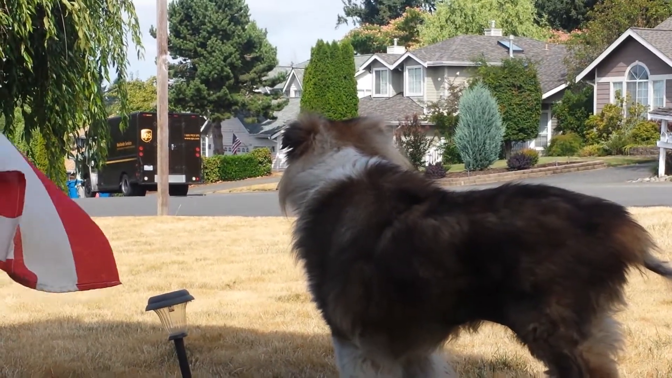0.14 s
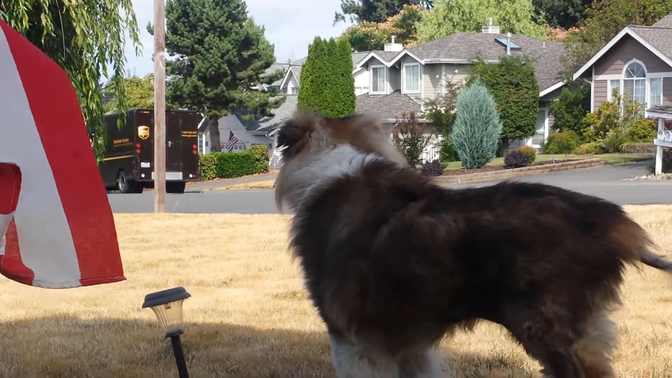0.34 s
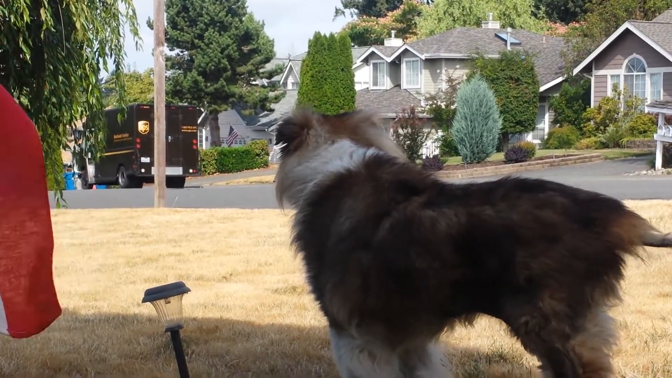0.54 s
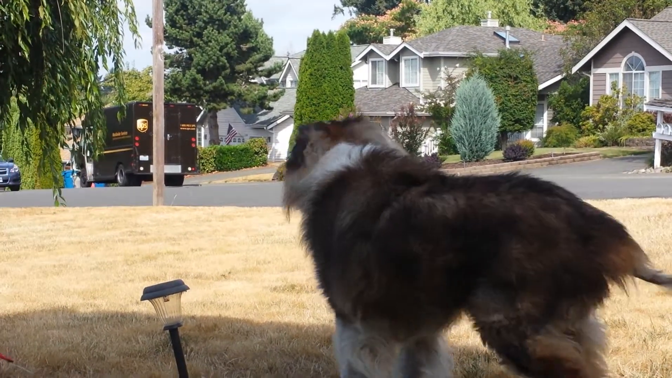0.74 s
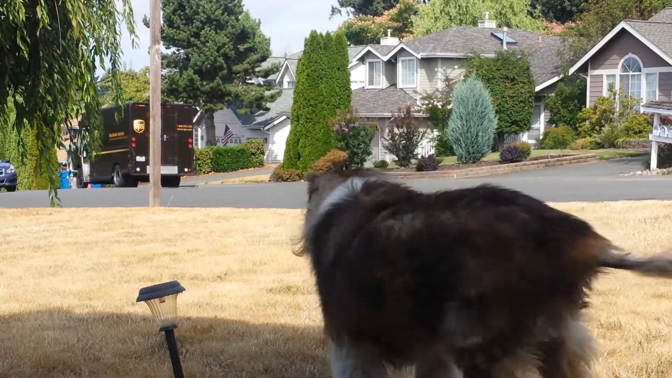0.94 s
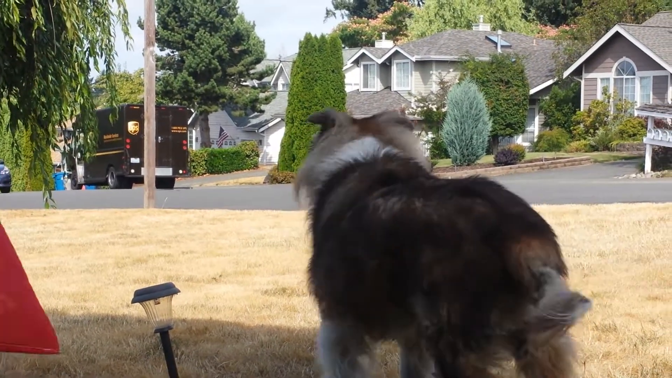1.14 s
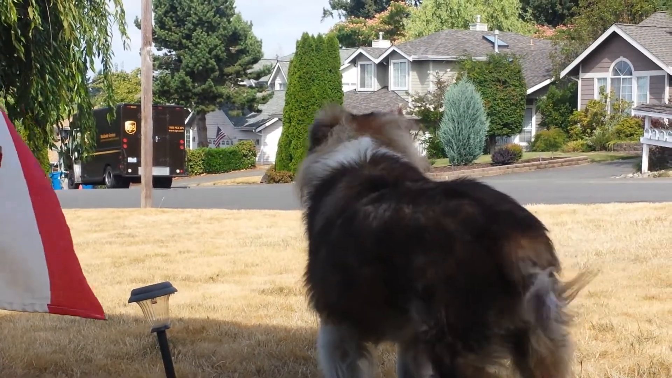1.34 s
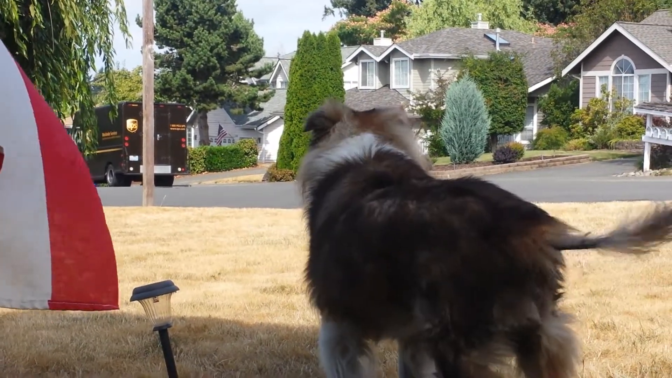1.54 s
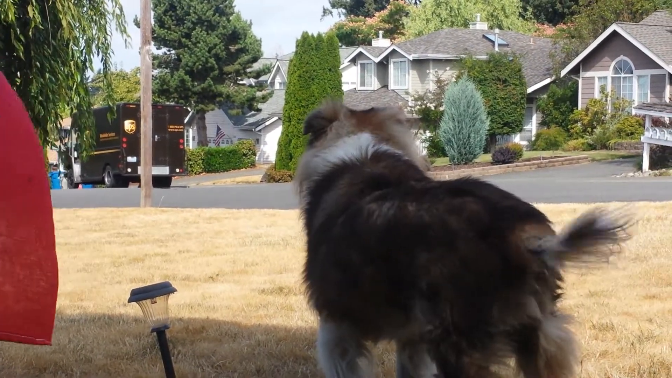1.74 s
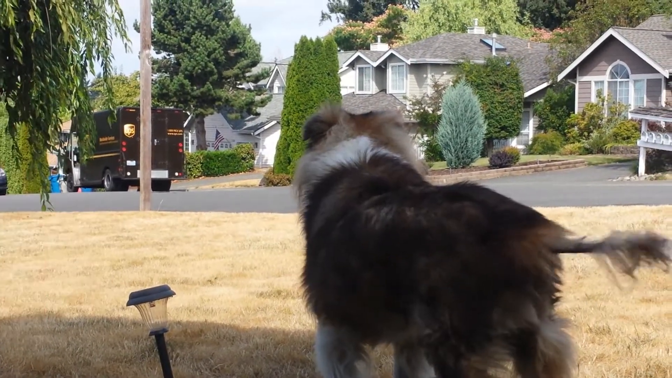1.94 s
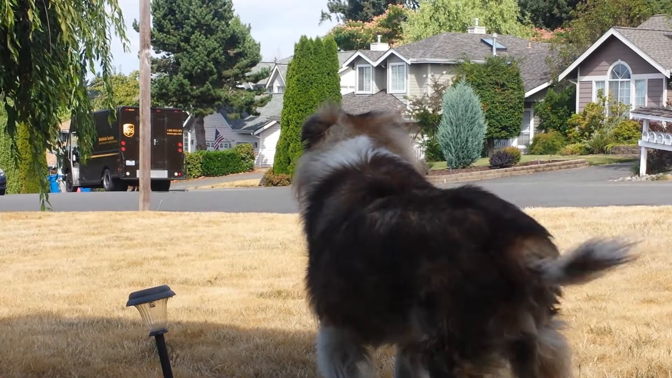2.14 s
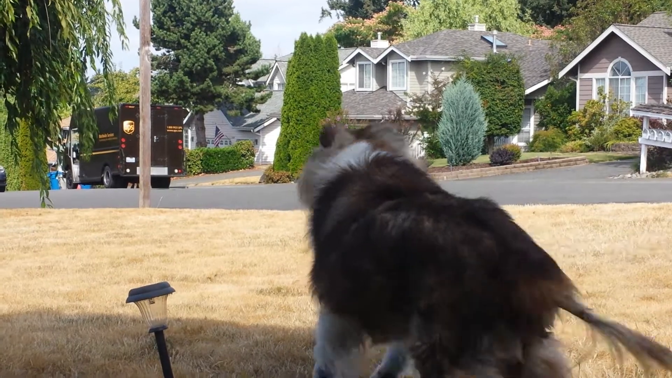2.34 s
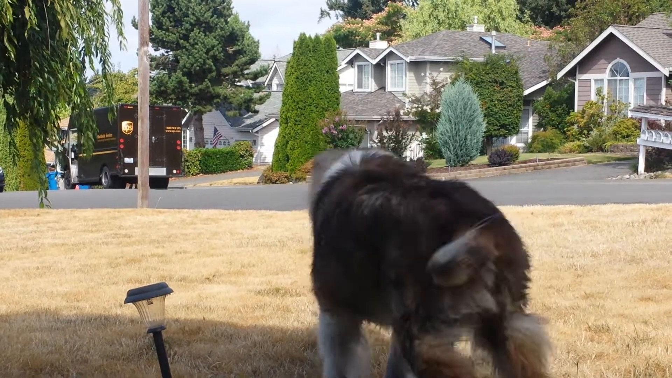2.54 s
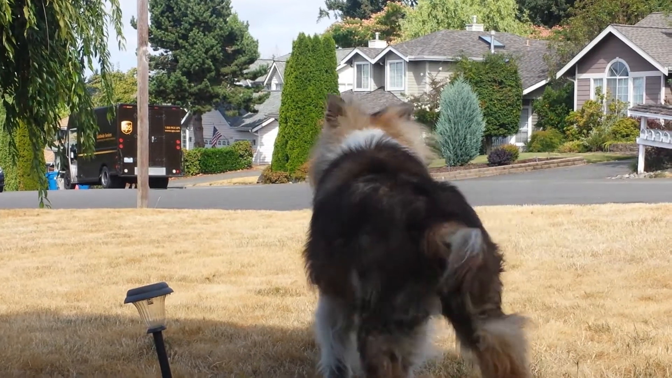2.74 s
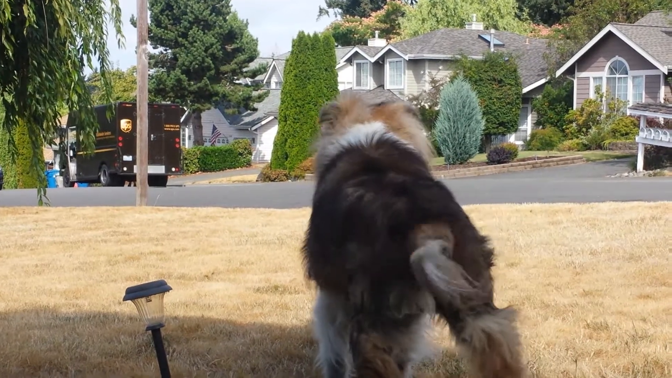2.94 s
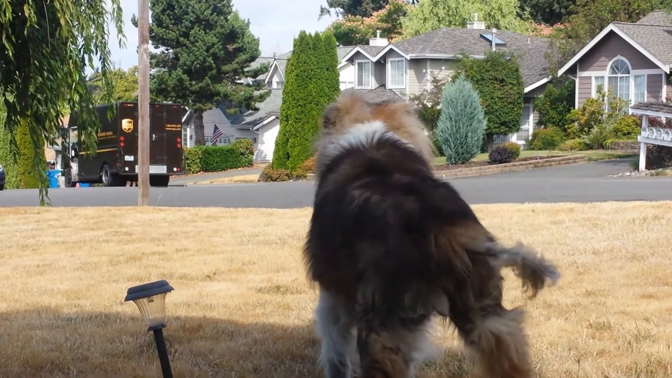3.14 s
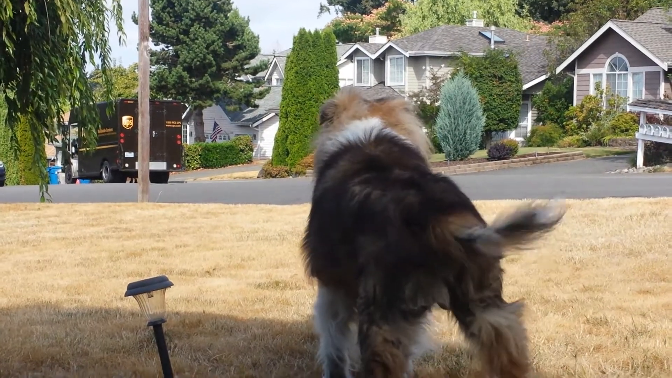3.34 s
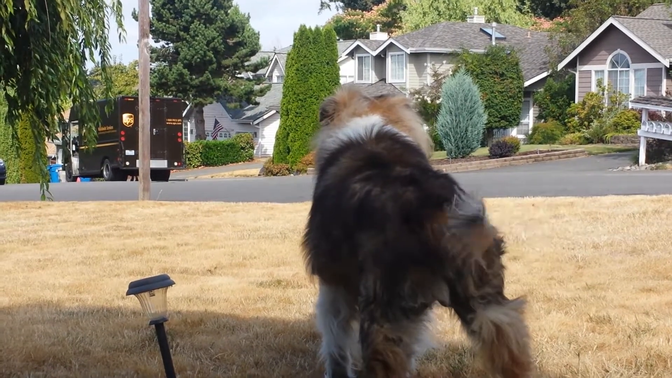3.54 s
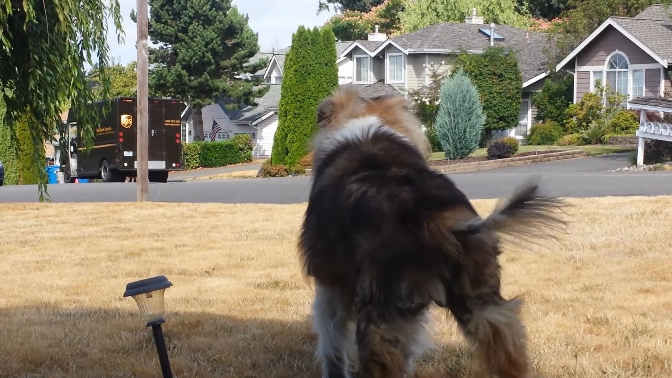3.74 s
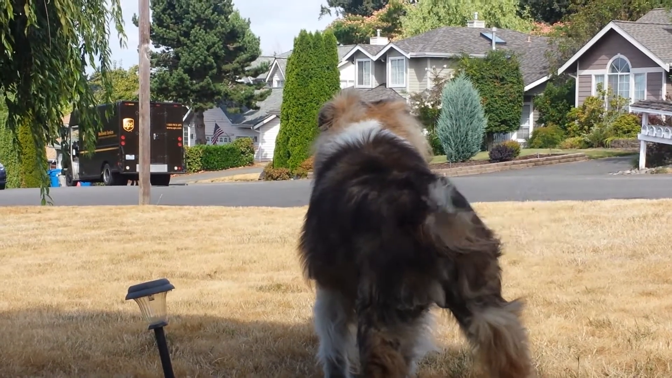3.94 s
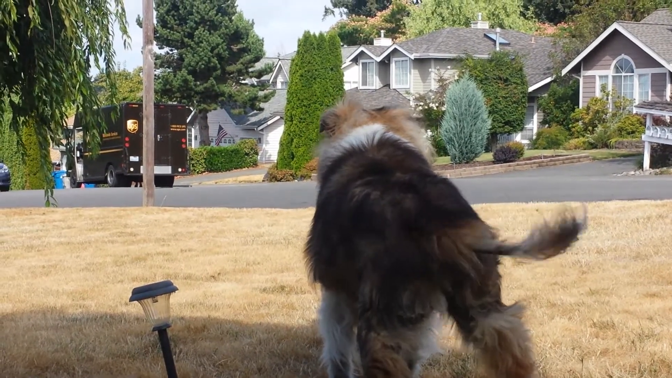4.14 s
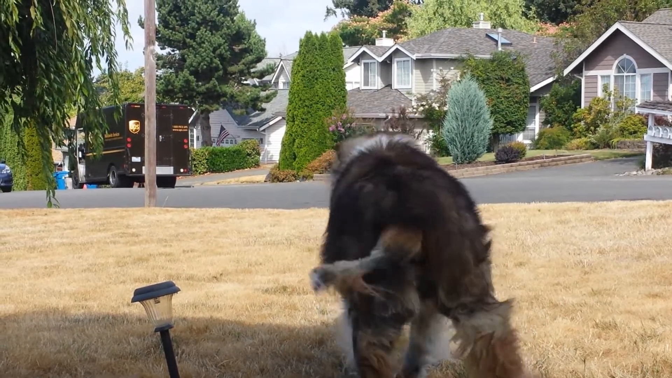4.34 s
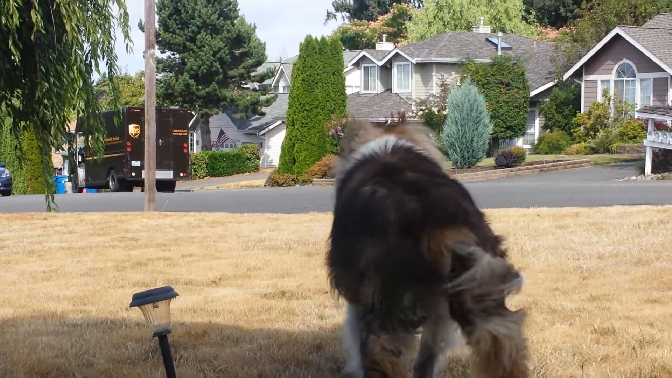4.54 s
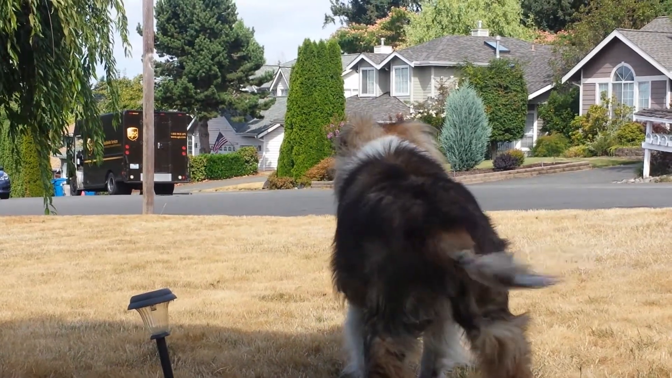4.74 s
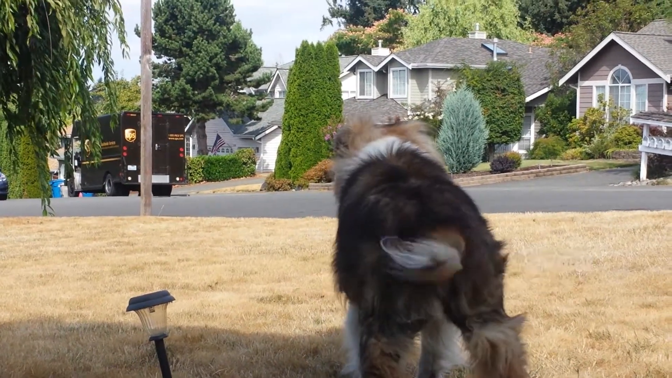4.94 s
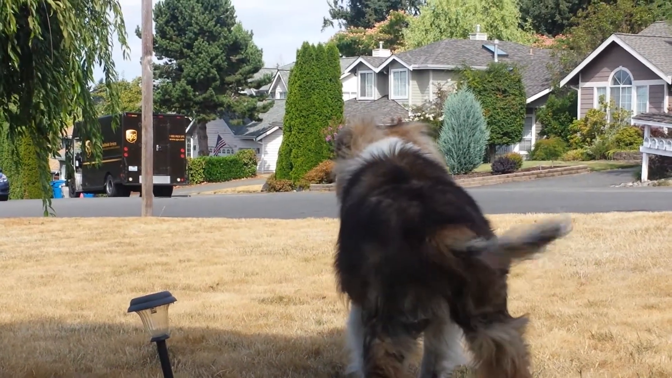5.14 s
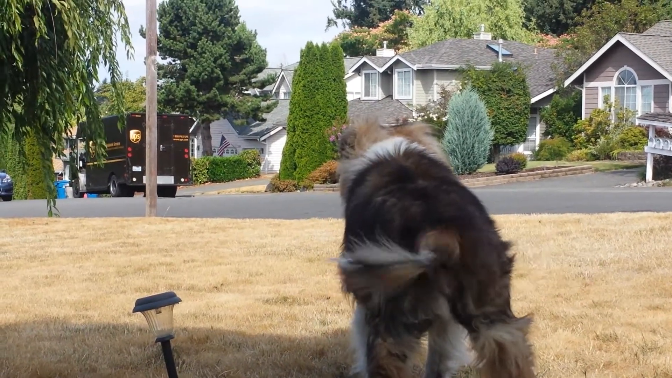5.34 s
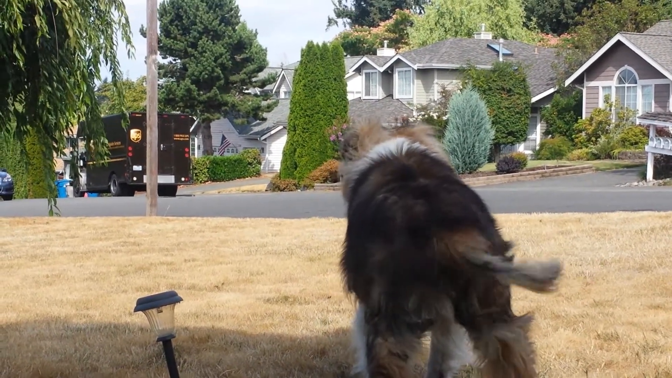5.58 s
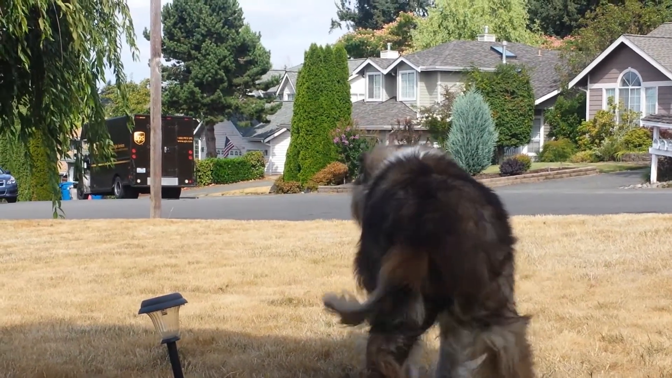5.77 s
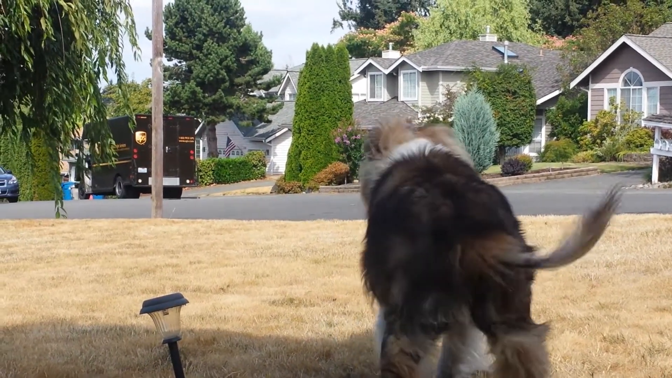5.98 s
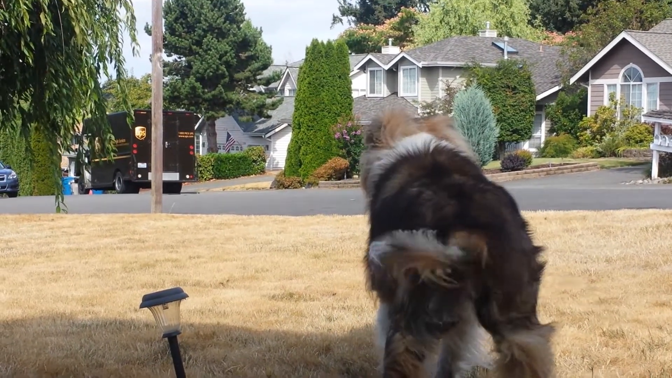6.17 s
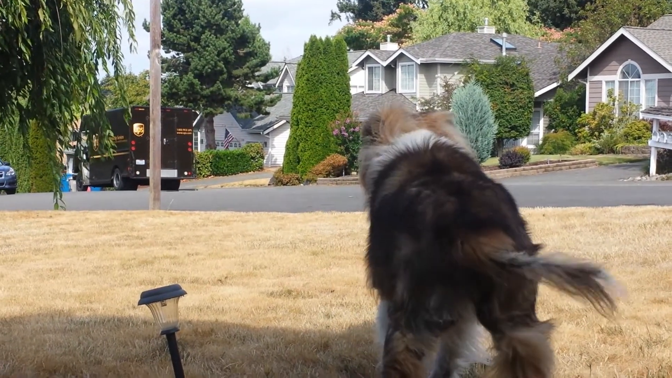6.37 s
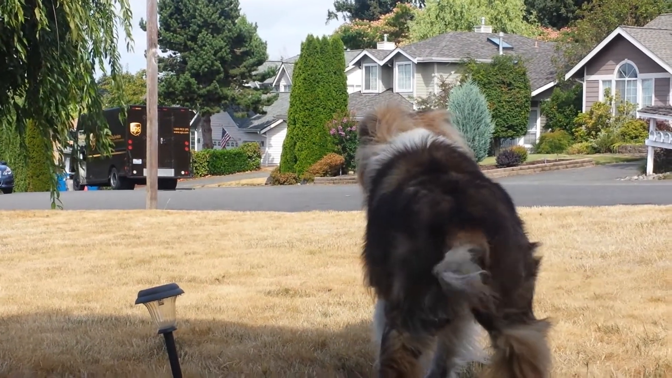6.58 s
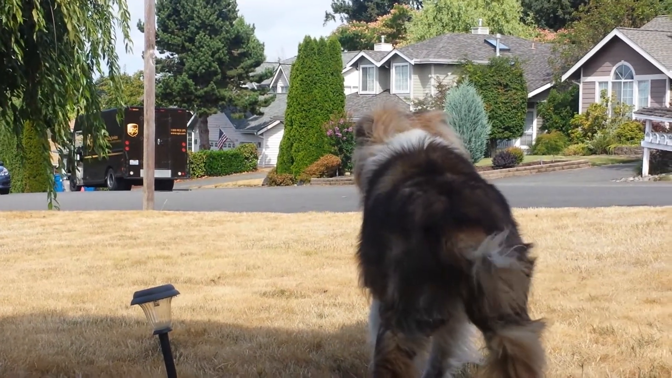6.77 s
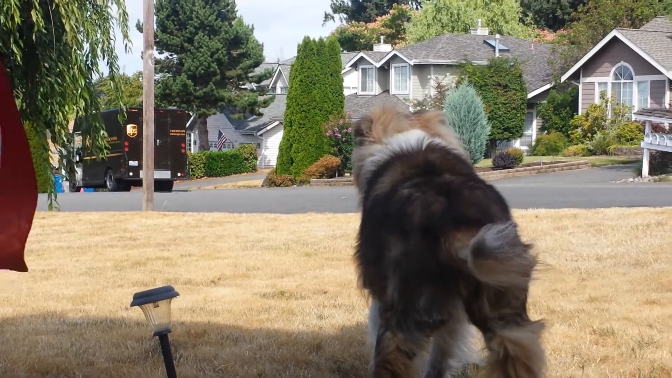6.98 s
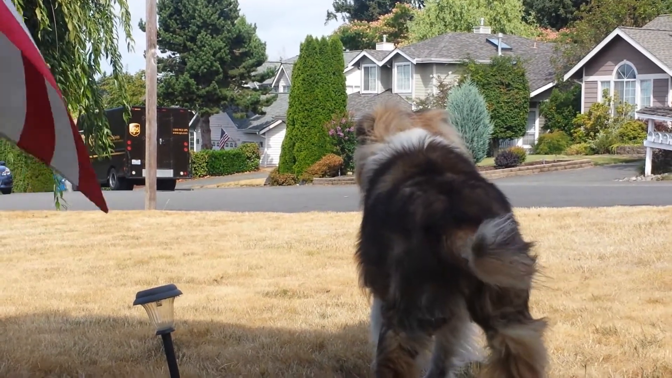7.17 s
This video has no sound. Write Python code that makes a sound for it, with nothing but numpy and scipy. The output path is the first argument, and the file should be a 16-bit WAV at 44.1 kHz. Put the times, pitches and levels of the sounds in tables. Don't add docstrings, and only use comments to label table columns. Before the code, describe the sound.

A large dog close by on a dry lawn starts with a long wavering howl-like bark, sinks into a low rattling growl, then gives a short bark. After a pause come a hoarse, breaking bark, more growling and a last clear bark. Collar tags clink faintly, grass rustles, small ticks follow. Distant traffic and an idling van rumble underneath; nearby walls and houses return a short echo to the small stereo microphone.

```python
import sys
import numpy as np
from scipy import signal
from scipy.fft import rfft, irfft, next_fast_len
from scipy.io import wavfile
from scipy.ndimage import uniform_filter1d, minimum_filter1d, map_coordinates

SR = 44100
rng = np.random.default_rng(int(sys.argv[2]) if len(sys.argv) > 2 else 0)


def gain_from_decibels(decibels):
    exponent = np.asarray(decibels, float) / 20
    return 10 ** exponent


def store_pcm(level_fs):
    pcm = np.round(np.clip(level_fs, -1, 1) * 32767).astype(np.int16)
    wavfile.write(sys.argv[1], SR, np.atleast_2d(pcm).T)


N = 318005
TIME = np.arange(N) / SR

# (time [s], pitch [Hz], level [dB], jaw drop: overtone lift [dB])
HOWLS = [
    [(.76, 421, -20.5, -1.5), (.81, 505, -11.5, 4.5), (.87, 522.2, -15.5, 2), (.96, 442.2, -8.5, -4.5),
     (1.08, 542.5, -7, -4), (1.15, 481, -9.5, -4.5), (1.27, 405.8, -16, -8), (1.33, 350.5, -31.5, 5.5),
     (1.5, 205, -46, -23)],
    [(2.28, 378.3, -28.5, -18), (2.33, 415, -14, 9.5), (2.39, 495.6, -8, 4), (2.43, 523.5, -5, 0.5),
     (2.47, 490, -8, -3), (2.52, 419.6, -10, -4), (2.56, 406.3, -19, -9)],
    [(4.17, 220, -50, -26), (4.22, 340, -22, -32), (4.27, 449, -13, -6), (4.31, 521.7, -11.5, 2),
     (4.36, 536.5, -11.5, 0.5), (4.385, 506, -18.5, 6.5), (4.43, 459.6, -8.5, -10), (4.55, 440, -31.5, -17)],
    [(5.64, 369, -29.5, -28.5), (5.69, 435, -10, -2), (5.73, 499.5, -8.5, 2.5), (5.78, 529.8, -5, 2.5),
     (5.83, 493, -9.5, -15.5), (5.88, 418.8, -11, -5.5), (5.93, 401, -21, 8)],
]
# (clear from [s], clear until [s], least hoarseness [0-1])
CLEAR_SPANS = [
    (.95, 1.24, .05),
    (2.37, 2.51, .06),
    (4.42, 4.43, .52),
    (5.73, 5.86, .1),
]
SECOND_DB = [0, -3.5, -0.5, -3]
UPPER_DB = [1, -3, 0, -5]
# (frequency [Hz], level [dB])
JAW = [(650, -31.5), (850, -17), (980, -24.5), (1080, -20), (1280, -31), (1450, -18), (1600, -31.5)]
# (frequency [Hz], level [dB])
UPPER = [(1500, -4.5), (2100, -2.5), (2600, -11), (3400, -16), (4000, -38), (5300, -19), (7500, -18.5),
         (8500, -45.5)]
# (frequency [Hz], width [Hz], level [dB])
RASP = [
    [(886, 390, 0)],
    [(1397, 46, 0)],
]
# (time [s], effort [dB], mouth opening [0-1])
GROWLS = [
    [(.75, -19, 0.5), (.86, -28.5, 1), (1.27, -41.5, 0.9), (1.47, -35, 0), (2.18, -30, 0.33),
     (2.34, -20.5, 0.86), (2.58, -23.5, 0.86), (2.72, -28, 0.71), (2.95, -38, 0.33)],
    [(4.15, -33, .15), (4.28, -16, 0.94), (4.54, -24.5, 0.9), (4.77, -31, 0.31), (5, -35.5, 0.2),
     (5.55, -25.5, 0.38), (5.71, -23, 0.94), (6, -26.5, 0.86), (6.31, -39.5, 0.35)],
]
# (mouth shut [dB], mouth open [dB])
THROAT_RING_DB = [(-20, 11), (-7.5, 5.4)]
# (time [s], rate [1/s])
SLAPS = [(.7, 150), (.9, 230), (1.35, 170), (1.5, 88), (1.7, 92), (2.1, 83), (2.3, 150), (2.6, 140),
         (2.82, 118), (2.95, 80), (4.1, 100), (4.5, 325), (4.7, 262), (4.8, 110), (4.9, 88), (5.4, 102),
         (5.65, 150), (6.35, 95)]
# (frequency [Hz], width [Hz], level [dB])
CHEST = [(145, 116.5, 0), (287.5, 53.6, 1.5)]
THROAT = [(440, 84, 12.5), (670, 1100, -22.5)]
MOUTH = [(662, 120.3, 9.5), (833, 530, 0.5), (1357, 120, 0), (2000, 130, -36), (2530, 74, -36.5),
         (3330, 390, -21.5)]
TEETH = [(3410, 330, -4), (5450, 440, 0), (6150, 110, -1), (6330, 310, -6), (7580, 610, -6)]
# (time [s], level [dB], rise [dB/s])
WHISTLES = [
    (.79, -38, 894.5),
    (2.28, -46, 259),
    (4.25, -44.5, 408),
    (5.62, -54.5, 47),
    (6.15, -57.5, 41.5),
]
# (time [s], peak [dB])
TAGS = [
    (.997, -57),
    (1.046, -55),
    (1.5589, -48),
]
# (frequency [Hz], level [dB], t60 [s])
TIN = [(7101, -5, .22), (8086, 3, .35), (11670, -9, .1), (12800, -16, .05), (14700, -10, .05)]
# (time [s], peak [dB], fading [s])
STEPS = [(0.849, -65.5, 0.33), (1.001, -56.5, 0.025), (1.047, -54.5, 0.034), (1.2, -54, 0.033),
         (1.572, -67.5, 0.022), (2.31, -58, 0.12), (2.451, -50.5, 0.013), (2.641, -48.5, 0.086),
         (2.809, -59.5, 0.016), (4.659, -65.5, 0.032), (5.66, -73, 0.23), (5.92, -71.5, 0.17)]
# (time [s], peak [dB], frequency [Hz])
TICKS = [
    (3.199, -46.5, 780.2),
    (6.349, -43.5, 2893),
    (6.52, -47, 2770),
    (6.7, -53, 2950),
    (6.748, -52, 3000),
    (6.93, -43, 1410),
    (7.099, -41.5, 2940),
]
# (frequency [Hz], density [dB/Hz])
STRAW = [(4120, -20.5), (7000, -4), (8130, -3.5), (9510, -12), (14900, -12), (15500, -11)]
# (delay [s], left [dB], right [dB])
WALLS = [(.011, -16, -24), (.019, -21, -12), (.034, -19, -22), (.052, -16, -21)]
# (frequency [Hz], t60 [s])
HOUSES = [(200, 0.5), (500, 0.42), (2000, 0.1), (8000, 0.22)]
# (time [s], level [dB])
TRAFFIC = [(0, -42.5), (.24, -41), (.68, -50), (3, -51.5), (3.2, -50.5), (3.75, -45), (3.87, -48),
           (6.4, -49.5), (7, -46.5), (7.21, -43.5)]
# (time [s], level [dB])
IDLE = [(0, -44.5), (.86, -59), (2.1, -47.5), (4.22, -44.5), (4.45, -60), (5, -49), (5.4, -63),
        (7.21, -52.5)]
# (time [s], level [dB])
WHINE = [(6.3, -76.5), (6.55, -56.5), (7.1, -55.5), (7.21, -58.5)]
# (time [s], level [dB])
FADING = [(0, -35.5), (.2, -40), (.7, -48.5), (1, -79.5)]
# (frequency [Hz], density [dB/Hz])
RUMBLE = [(13, -54), (22, -23.5), (43, -5.5), (81, -17), (103, 1.5), (129, 4.5), (252, 1), (372, -8.5),
          (450, -21.5), (580, -38), (990, -120)]
ROAR = [(210, -56), (350, -7.5), (376, -13.5), (501, -0.5), (633, -6), (830, -4.5), (1400, -14),
        (3000, -30), (3900, -61.5), (6600, -120)]
LEAVES = [(1180, -27.5), (2000, -0.5), (2610, -3.5), (3070, -1), (3550, -6), (5220, -2.5), (5890, 0),
          (6640, -6.5), (8080, -2.5), (9190, -37), (15500, -19.5)]
# (frequency [Hz], left-right likeness [-1 to 1])
ALIKE = [(60, 0.89), (180, 0.97), (550, 0.73), (1650, -0.21), (4970, -0.11), (15000, 0.32)]
# (frequency [Hz], left minus right [dB])
TILT = [(60, 2), (130, 2), (290, 2), (640, 4), (1410, 5), (3100, 7), (6820, -0.5), (15000, -7)]
HOARSE_START, CLEARS_S, BREAKS_S, BREAKS_BY = .85, .06, .075, .45


def unit(x):
    return x / np.sqrt(np.mean(x ** 2) + 1e-20)


def along(points, hz):
    f, v = np.transpose(points)
    return np.interp(np.log(hz + 1), np.log(f + 1), v)


def curves(rows):
    s, *cols = np.transpose(rows)
    return [np.interp(TIME, s, c) for c in cols]


def sounding(rows, fade_s):
    inside_s = np.minimum(TIME - rows[0][0], rows[-1][0] - TIME)
    return np.clip(inside_s / fade_s + 1, 0, 1) ** 2


def peak(s, rise_db_s, fall_db_s):
    return np.where(TIME < s, rise_db_s * (TIME - s), fall_db_s * (s - TIME))


def wobble(rate_hz):
    return map_coordinates(rng.standard_normal(int(N * rate_hz / SR) + 4), [TIME * rate_hz])


def filtered(x, response):
    m = next_fast_len(N + SR // 2)
    return irfft(rfft(x, m) * response(np.fft.rfftfreq(m, 1 / SR)), m)[..., :N]


def ringing(x, modes):
    def response(f):
        total = 0
        for k, (center, width, db) in enumerate(modes):
            resonance = 1j * f * width / (center ** 2 - f * f + 1j * f * width)
            total = total + (-1) ** k * gain_from_decibels(db) * resonance
        return total
    return unit(filtered(x, response))


def patchy(x, depth_db):
    z = signal.stft(x, nperseg=512)[2]
    field = uniform_filter1d(rng.standard_normal(z.shape[1:]), size=3, axis=0)
    field = uniform_filter1d(field, size=12, axis=1)
    return signal.istft(z * gain_from_decibels(depth_db * unit(field)), nperseg=512)[1][:, :N]


def rush(spectrum, patchy_db):
    def mid_side(hz):
        turn = np.arccos(np.clip(along(ALIKE, hz), -1, 1)) / 2
        return gain_from_decibels(along(spectrum, hz)) * np.array([np.cos(turn), np.sin(turn)])
    mid, side = filtered(patchy(rng.standard_normal((2, N)), patchy_db), mid_side)
    return np.array([mid + side, mid - side]) / np.std(mid)


def howl():
    hoarse = hoarseness()
    pitch_hz = uniform_filter1d(curves(np.concatenate(HOWLS))[0], size=1500)
    phase = 2 * np.pi * np.cumsum(pitch_hz) / SR
    gate = 1 + 1.4 * np.sin(phase)
    rasps = []
    for jaw in RASP:
        rasp = ringing(gate * rng.standard_normal(N), jaw)
        rasps.append(ringing(rasp, [(jaw[0][0], 300, 0)]))
    voice = np.zeros(N)
    for rows, second_db, upper_db in zip(HOWLS, SECOND_DB, UPPER_DB):
        level_db, jaw_db = curves(rows)[1:]
        on = sounding(rows, fade_s=0.014)
        part = on > 0
        rough, hz, lift_db = hoarse[part], pitch_hz[part], jaw_db[part]
        for k in range(1, 17):
            shake, flutter = rough * wobble(120)[part], rough * wobble(70)[part]
            db = level_db[part]
            if k == 2:
                db = db + along(JAW, k * hz) + 20 * rough + 0.13 * lift_db + second_db
            elif k == 3:
                db = db + along(JAW, k * hz) + 20 * rough + lift_db
            elif k > 3:
                db = db + along(UPPER, k * hz) - 36 + 5 * rough + .4 * lift_db + upper_db
            drift_db = 0
            if k > 1:
                drift_db = 1.2 * wobble(16)[part] if k < 4 else 5.5 * wobble(24)[part]
            jitter = (.75 if k == 1 else 1.6) * (shake + .02 * k * wobble(60)[part])
            tone = np.sqrt(2) * gain_from_decibels(drift_db + 3.5 * flutter) * np.sin(k * phase[part] + jitter)
            if k in (2, 3):
                lost = np.maximum(rough, np.clip((395 - hz) / 30, 0, 1))
                tone = np.sqrt(1 - lost) * tone + np.sqrt(lost) * 0.71 * rasps[k - 2][part]
            voice[part] += on[part] * gain_from_decibels(db) * tone
    return voice


def hoarseness():
    rows = []
    for cry, (start, end, least) in zip(HOWLS, CLEAR_SPANS):
        rows += [(cry[0][0], HOARSE_START), (start - CLEARS_S, HOARSE_START), (start, least), (end, least),
                 (end + BREAKS_S, least + BREAKS_BY)]
    return curves(rows)[0]


def crying():
    hush_s, return_s = 0.072, 0.036
    share = 0
    for cry, (_, end, _) in zip(HOWLS, CLEAR_SPANS):
        onset, release = (TIME - cry[0][0]) / hush_s, (end + BREAKS_S - TIME) / return_s
        share = share + np.clip(np.minimum(onset, release), 0, 1)
    return share * np.clip((curves(np.concatenate(HOWLS))[0] - 380) / 70, 0, 1)


def fold_slaps(rate_hz, uneven):
    cycles = np.cumsum(rate_hz * (1 + .05 * wobble(15))) / SR
    at = np.flatnonzero(np.diff(np.floor(cycles)))
    late, strength = rng.standard_normal((2, len(at)))
    shift = (.45 * uneven[at] * late * SR / rate_hz[at]).astype(int)
    slaps = np.zeros(N)
    strength_db = (.7 + 2 * uneven[at]) * strength
    np.add.at(slaps, np.clip(at + shift, 0, N - 1), gain_from_decibels(strength_db) / np.sqrt(rate_hz[at]))
    return slaps


def growl():
    rate_hz, = curves(SLAPS)
    uneven = .5 * np.clip((rate_hz - 77) / (148 - 77), 0, 1)
    slaps = fold_slaps(rate_hz, uneven)
    puffs = unit(signal.fftconvolve(slaps, np.exp(-np.arange(600) / 130))[:N])
    slaps = unit(slaps)
    air = rng.standard_normal((4, N))

    low = lambda hz: 1 / (1 + (hz / 750) ** 4) / (1 + (90 / (hz + 1)) ** 4)
    thud = filtered(slaps + 0.91 * uneven * puffs * air[0], low)
    chest = ringing(ringing(thud, CHEST), [(220, 1100, 0)])
    deep = filtered(chest, lambda hz: 1 / (1 + (hz / 190) ** 4))
    chest = chest - np.interp(rate_hz, (105, 175), (0, 1)) * deep
    throat = ringing(ringing(thud + 0.15 * air[1], THROAT), [(464, 220, 0)])
    mouth = ringing(ringing(0.64 * slaps + puffs * air[1], MOUTH), [(960, 3900, 0)])

    dark = lambda hz: 1 / (1 + (hz / 8400) ** 12) / (1 + gain_from_decibels(15.5) * np.exp(-((hz - 4100) / 450) ** 2))
    breath = filtered(gain_from_decibels(1.2 * wobble(45)) * (.7 + .5 * puffs) * air[2:], dark)
    breath = ringing(patchy(breath, 3.5), TEETH)
    whistle = ringing(gain_from_decibels(2.5 * wobble(40)) * air[2:], [(2830, 200, 0)])
    whistle = ringing(whistle, [(2850, 400, 0)])

    body = 0
    hiss = sum(gain_from_decibels(db + peak(s, rise_db_s, fall_db_s=91)) for s, db, rise_db_s in WHISTLES) * whistle
    cry = crying()
    clear = cry * np.clip(1 - hoarseness() / HOARSE_START, 0, 1)
    for rows, ring_db in zip(GROWLS, THROAT_RING_DB):
        effort_db, opening = curves(rows)
        throat_db = np.interp(opening, (0, 1), ring_db)
        mouth_db = effort_db + np.interp(opening, (0, 1), (-30.5, -3.5)) - 29 * clear
        breath_db = np.interp(opening, (0, 1), (-80, -42.5))
        chest_db = effort_db - 30 * cry
        on = sounding(rows, fade_s=0.035)
        body = body + on * (gain_from_decibels(chest_db) * (chest + gain_from_decibels(throat_db) * throat) + gain_from_decibels(mouth_db) * mouth)
        hiss = hiss + on * gain_from_decibels(breath_db) * breath
    return body, hiss


def collar():
    out, t = np.zeros(N + SR), TIME[:SR // 2]
    for s, db in TAGS:
        ring = 0
        for hz, mode_db, t60_s in TIN:
            decay_db = db + mode_db + rng.normal(0, 2) - 60 * t / t60_s
            ring = ring + gain_from_decibels(decay_db) * np.sin(2 * np.pi * hz * t)
        out[round(s * SR):][:len(t)] += ring * (1 - np.exp(-t / .002))
    return out[:N]


def lawn():
    drop_db, rise_share = 11, 0.3
    rustle = gain_from_decibels(-65)
    for s, db, fade_s in STEPS:
        rustle = rustle + gain_from_decibels(db + peak(s, drop_db / rise_share / fade_s, drop_db / fade_s))
    out, t = np.zeros((2, N + SR)), TIME[:1500]
    for s, db, hz in TICKS:
        burst = 2 * gain_from_decibels(-60 * t / .012) * np.sin(2 * np.pi * hz * t) + rng.standard_normal((2, len(t)))
        envelope = gain_from_decibels(db - 1.0 - 60 * t / 0.074) * (1 - np.exp(-t / .001))
        out[:, round(s * SR):round(s * SR) + len(t)] += envelope * burst
    soft = filtered(out[:, :N], lambda hz: 1 / (1 + (hz / 6000) ** 2))
    return soft + rustle * gain_from_decibels(1.2 * wobble(67)) * rush(STRAW, patchy_db=-4.0)


def yard(x):
    hz, t, z = signal.stft(rng.standard_normal((2, SR // 2)), SR, nperseg=256)
    decay = gain_from_decibels(-60 * t / along(HOUSES, hz)[:, None])
    tail = signal.istft(z * decay, SR, nperseg=256)[1]
    reply = np.pad(gain_from_decibels(-15.5) * tail / np.linalg.norm(tail[0]), ((0, 0), (1300, 0)))
    for s, left_db, right_db in WALLS:
        reply[:, round(s * SR)] += gain_from_decibels([left_db, right_db])
    return signal.fftconvolve(x[None], reply, axes=1)[:, :N]


def street():
    rumble_db, = curves(TRAFFIC)
    roar_db = rumble_db - np.interp(TIME, (3.5, 7.3), (0, 7))
    leaves_db = -67 + 17 * np.exp(-TIME / 0.19)
    noise = gain_from_decibels(rumble_db + 1.5 + 1.5 * wobble(2.4)) * rush(RUMBLE, patchy_db=0.0)
    noise += gain_from_decibels(roar_db - 0.73 + 0.78 * wobble(29)) * rush(ROAR, patchy_db=2.3)
    noise += gain_from_decibels(leaves_db + 3.5 + 0.52 * wobble(30)) * rush(LEAVES, patchy_db=3.5)

    firing_phase = 2 * np.pi * np.cumsum(77.5 + 2.4 * wobble(23)) / SR
    hum = gain_from_decibels(curves(IDLE)[0] + 0.62 * wobble(2.1)) * np.sin(firing_phase)
    motor_noise = ringing(rng.standard_normal(N), [(818, 25, -5), (963, 10, 0)])
    whine = gain_from_decibels(curves(WHINE)[0]) * (np.sin(2 * np.pi * 963 * TIME) + .6 * motor_noise)
    diffuse = rng.standard_normal((2, N)) + 2 * rng.standard_normal(N)
    echo = ringing(diffuse, [(523, 51, 3.5), (715, 66, -3.0), (1210, 98, -10.0)])
    return noise + hum + whine + gain_from_decibels(curves(FADING)[0]) * echo


def scene():
    body, hiss = growl()
    shade = lambda hz: 1 / (1 + gain_from_decibels(30.0) * np.exp(-((hz - 4150) / 380) ** 2))
    dog = filtered(howl() + body, shade) + collar()
    lag = lambda hz: np.exp(-2j * np.pi * hz * np.array([[1], [-1]]) * 4e-5)
    direct = filtered(np.array([dog, dog]), lag)
    return direct + yard(dog) + hiss + lawn() + street()


def top_cut(x):
    return signal.sosfilt(signal.butter(12, 16650, fs=SR, output="sos"), x)


def record(dry):
    ports = lambda hz: gain_from_decibels(along(TILT, hz) / 2 * np.array([[1], [-1]])) * (hz < 15600)
    x = filtered(dry, ports)
    needed = np.minimum(1, .93 / (np.abs(x).max(axis=0) + 1e-9))
    x = x * uniform_filter1d(minimum_filter1d(needed, size=441), size=221)
    return top_cut(x)


dry = scene()
out = record(dry)
store_pcm(out)
```